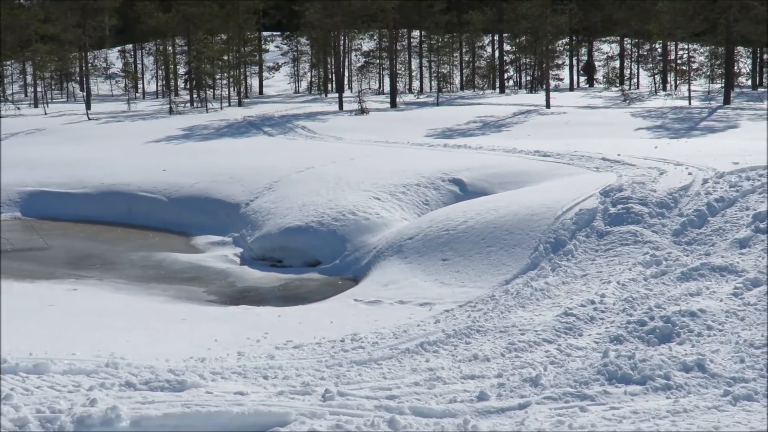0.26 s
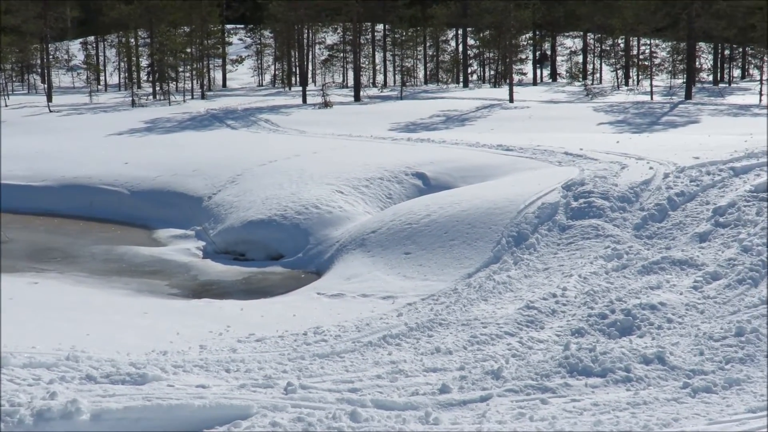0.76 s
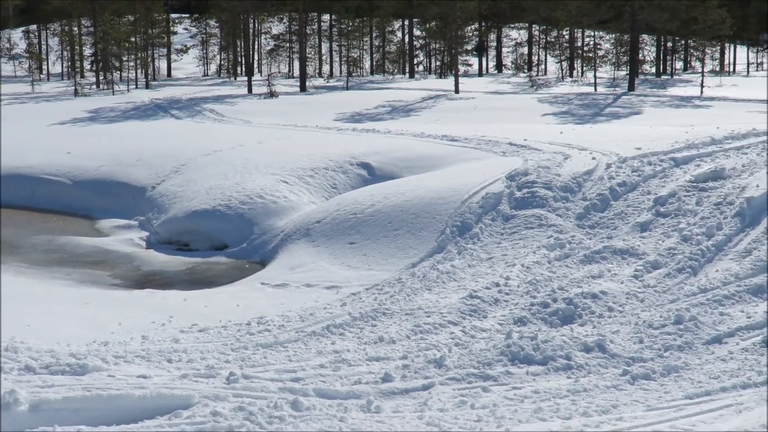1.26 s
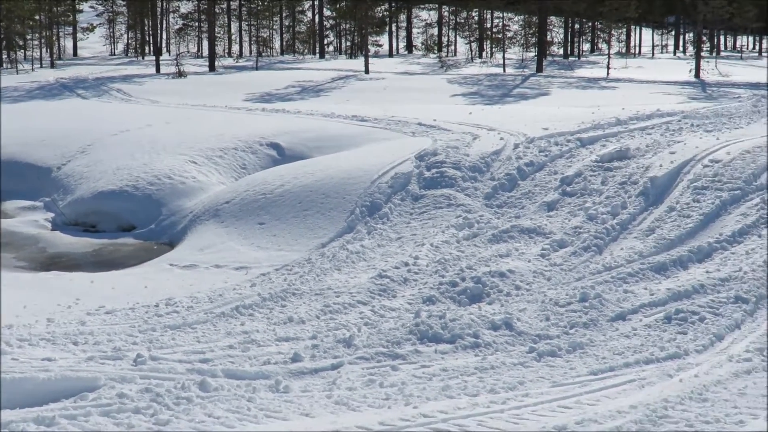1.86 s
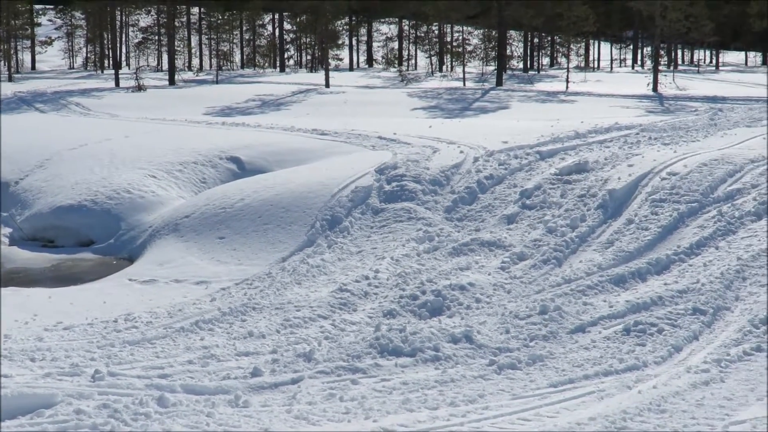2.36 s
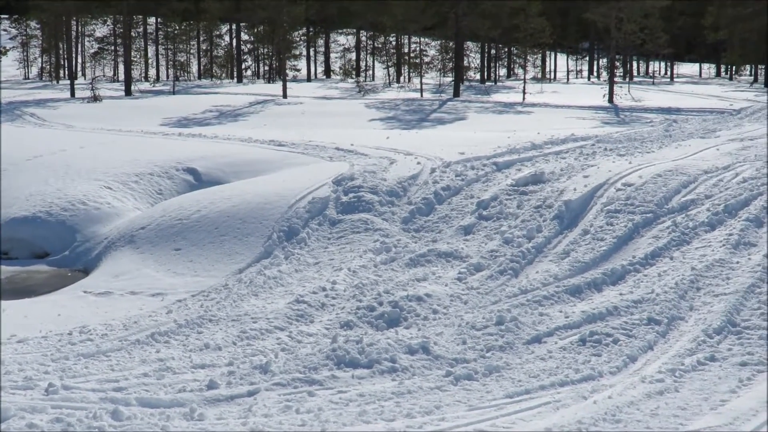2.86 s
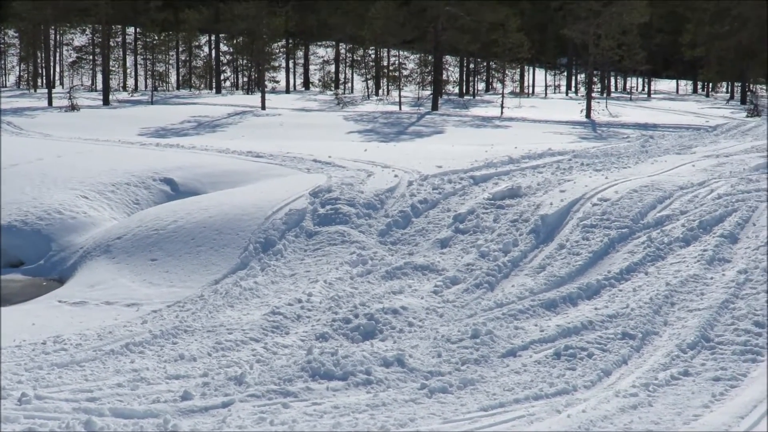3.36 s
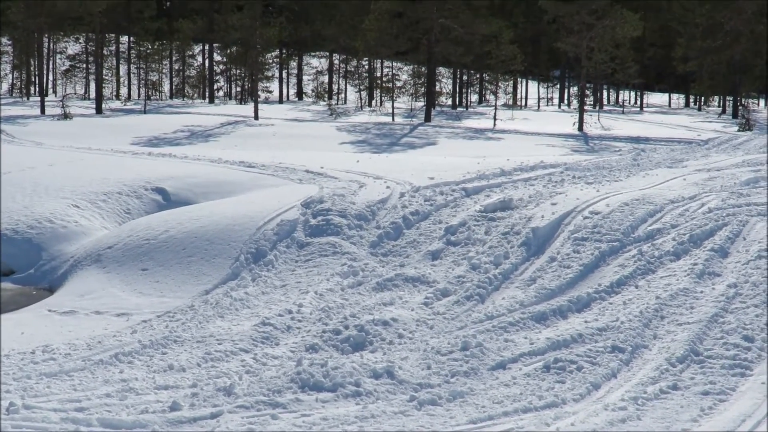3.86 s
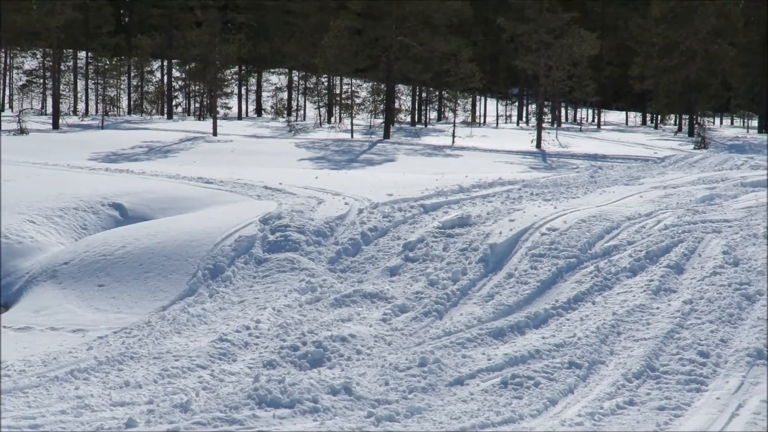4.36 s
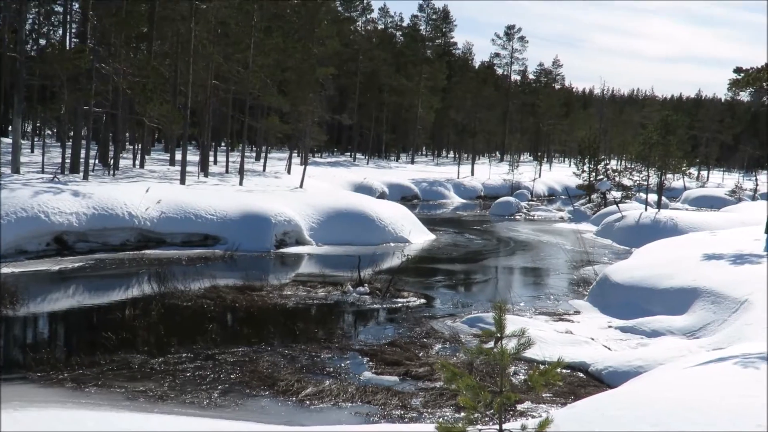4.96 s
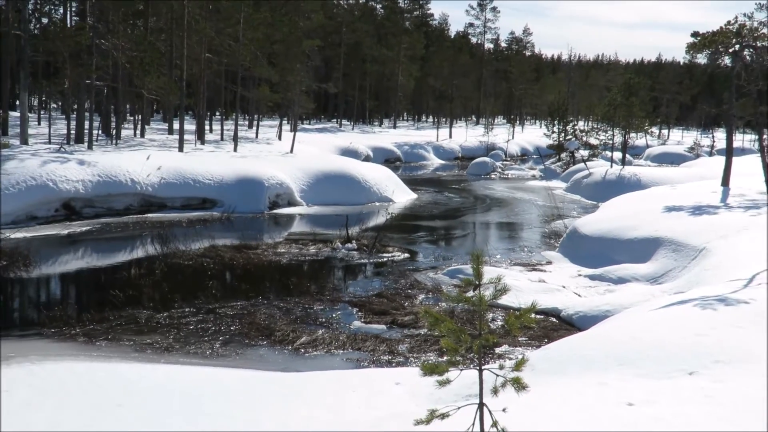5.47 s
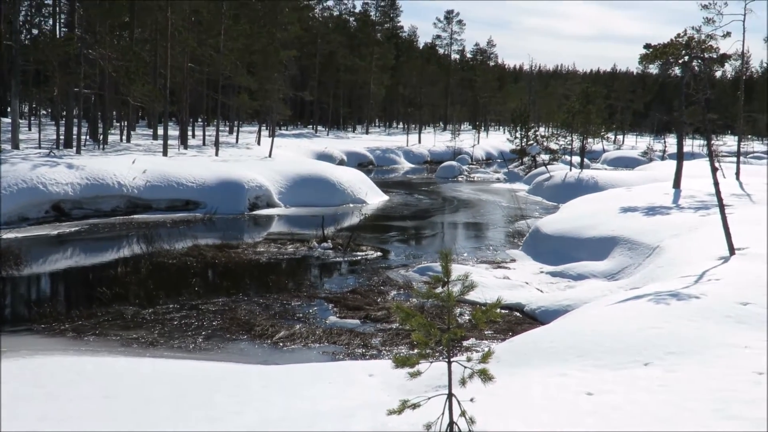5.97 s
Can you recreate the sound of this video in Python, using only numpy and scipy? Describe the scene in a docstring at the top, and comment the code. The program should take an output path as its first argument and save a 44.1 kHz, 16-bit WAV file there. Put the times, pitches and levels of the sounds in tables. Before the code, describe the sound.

Outdoors on open snow, a two-stroke snowmobile idles close to the microphone. Its deep, rapid muffled putter hunts constantly, catching harder about six times a second and sagging again. A quieter casing rasp, faint metallic ticks, occasional dull knocks and light low wind buffets accompany it. Near four and a half seconds comes a very short silence and a tiny pop, then the same engine continues from a sheltered spot, with stronger rattling and no wind.

```python
"""Open snow: a two-stroke snowmobile idles close by, two firings to each turn of the crank.
It hunts: about six times a second a few firings catch strongly, then the charge burns weakly again.
Pulses and gas puffs boom through the muffler, sine orders form the intake drone, and filtered noise makes
the casing's rasp, its knocks, hiss swishes and light gusts; gritty scrapes ring as the piston's tick.
After a short silence the engine is heard from another, sheltered spot."""
import sys
import numpy as np
from scipy import signal
from scipy.fft import rfft, irfft, next_fast_len
from scipy.io import wavfile
from scipy.ndimage import uniform_filter1d

SR = 44100
rng = np.random.default_rng(int(sys.argv[2]) if len(sys.argv) > 2 else 0)


def log_audio(samples):
    """Write samples as a 16-bit WAV file to the path given in sys.argv[1]."""
    # one column per channel
    frames = np.atleast_2d(samples).T
    # limit to full scale, then quantise
    limited = np.clip(frames, -1, 1)
    pcm = np.round(limited * 32767).astype(np.int16)
    wavfile.write(sys.argv[1], SR, pcm)


N = 273861
T = np.arange(N) / SR

# The silence between spot A and spot B: start and end in seconds.
SILENCE = (4.5715, 4.6544)
# Engine speed. Each row: time in seconds, firings per second.
SPEED = [(0.0, 77.23), (0.5, 77.56), (0.9, 77.88), (1.3, 77.43), (1.65, 78.17), (2.0, 76.75), (2.4, 77.39),
         (2.8, 76.87), (3.1, 77.74), (3.4, 76.92), (3.7, 76.24), (4.0, 77.41), (4.4, 76.85), (4.8, 77.25),
         (5.2, 77.34), (5.6, 77.28), (5.9, 76.59), (6.2, 76.39)]
# Moments at which the engine catches. Each row: time in seconds, time to sag back in seconds,
# how early the pulses come in ms, how much harder they are in dB.
SURGES = [(0.122, 0.049, 1.9, 5.5), (0.284, 0.059, 1.7, 4.5), (0.456, 0.049, 2.0, 4.0),
          (0.549, 0.144, 0.5, 1.5), (0.732, 0.074, 2.0, 5.0), (0.824, 0.061, 0.8, 1.0),
          (0.923, 0.06, 1.9, 5.0), (1.026, 0.03, 1.2, 2.0), (1.204, 0.053, 1.5, 5.0),
          (1.315, 0.08, 1.5, 4.0), (1.511, 0.04, 1.6, 5.5), (1.692, 0.056, 1.8, 3.5),
          (1.823, 0.103, 0.7, 2.0), (1.963, 0.137, 1.5, 3.0), (2.14, 0.069, 1.9, 4.0),
          (2.295, 0.061, 1.7, 5.0), (2.406, 0.08, 1.5, 4.0), (2.58, 0.16, 1.3, 1.5),
          (2.78, 0.067, 2.3, 4.0), (2.971, 0.06, 1.1, 3.0), (3.145, 0.032, 0.8, 4.5),
          (3.314, 0.071, 2.2, 3.5), (3.482, 0.077, 2.2, 5.0), (3.648, 0.065, 2.1, 5.0),
          (3.775, 0.121, 1.4, 3.0), (3.967, 0.053, 1.5, 4.5), (4.206, 0.045, 1.3, 4.5),
          (4.345, 0.097, 1.5, 4.0), (4.495, 0.144, 1.7, 3.5), (4.675, 0.04, 0.8, 4.0),
          (4.808, 0.16, 1.5, 1.5), (4.955, 0.146, 2.5, 0.5), (5.131, 0.069, 2.5, 4.0),
          (5.263, 0.159, 1.3, 3.5), (5.471, 0.085, 1.8, 2.0), (5.612, 0.09, 1.0, 2.5),
          (5.701, 0.037, 1.7, 3.0), (5.848, 0.082, 2.4, 4.0), (6.0, 0.126, 1.8, 4.0)]
# Colour of the casing rasp at spot A. Each row: frequency in Hz, relative density in dB per Hz.
CASING_A = [(250, -7), (450, -0.5), (620, -1), (950, -2), (1250, -7), (1800, -13), (2400, -16.5),
            (3100, -18), (3800, -19.5), (5000, -28), (6000, -32.5), (8000, -37.5), (12000, -41),
            (14000, -50)]
# Cowl panel resonances. Each row: centre in Hz, width in Hz, height in dB.
PANELS = [(503, 28, -2), (565, 29, -8), (620, 100, 1), (655, 98, 3), (795, 28, -11), (810, 21, 4.5),
          (954, 29, 4), (1210, 15, -9.5), (1220, 110, 1.5), (1704, 58, 5), (1924, 39, 5.5), (2140, 74, 4),
          (2390, 54, 1.5), (2600, 78, -0.5), (2720, 120, -1.5), (3140, 130, -4.5), (3690, 110, -7),
          (4070, 68, 0), (4520, 110, -1.5)]


def gain_of(db):
    """Decibels to amplitude."""
    return 10 ** (np.asarray(db) / 20)


def evened(x):
    """Scales to rms 1."""
    return x / np.sqrt(np.mean(x ** 2) + 1e-20)


def curve(rows, column=1):
    """One column of a time table, interpolated at every sample."""
    rows = np.asarray(rows)
    return np.interp(T, rows[:, 0], rows[:, column])


def drift(rate_hz):
    """Random wander of rms 1, mostly slower than rate_hz."""
    hz = np.fft.rfftfreq(N, 1 / SR)
    spectrum = rfft(rng.standard_normal(N)) / (1 + (hz / rate_hz) ** 4)
    return evened(irfft(spectrum, N))


def swells(rows):
    """One bell per row (middle s, reach s, ..): it falls to exp(-2) one reach from its middle."""
    return np.array([np.exp(-2 * ((T - middle) / reach) ** 2) for middle, reach, _ in rows])


def colour(x, points, peaks=(), size=8192):
    """Causal minimum-phase filter from a spectrum in dB, with resonances laid over it."""
    hz = abs(np.fft.fftfreq(size, 1 / SR))
    f, db = np.transpose(points)
    db = np.interp(np.log(hz + 1), np.log(f + 1), db)
    for centre, width, height in peaks:
        db = db + height / (1 + (2 * (hz - centre) / width) ** 2)
    spectrum = np.exp(signal.hilbert(np.log(gain_of(db))).conj())
    response = np.fft.ifft(spectrum).real
    return signal.oaconvolve(x, response[:size // 2])[:N]


def clicks(times, sizes):
    """A train of single-sample clicks."""
    places = np.clip(np.round(times * SR).astype(int), 0, N)
    return np.bincount(places, sizes, N + 1)[:N]


def surges(times):
    """Course of every surge, 0 to 1: a quick catch and a slow sag."""
    catch_rise_s = .008
    start, sag_s = np.transpose(SURGES)[:2]
    since = times[:, None] - start
    catch = (1 + np.tanh(since / catch_rise_s)) / 2
    return catch * np.exp(-(np.maximum(since, 0) / sag_s) ** 3)


def surging(times):
    """How much harder the charge burns at these times, in dB."""
    return surges(times) @ np.array(SURGES)[:, 3]


def leading(times):
    """Seconds by which the engine runs early: it jumps ahead as it catches, then falls back."""
    return surges(times) @ np.array(SURGES)[:, 2] / 1000  # ms to s


def firings(cycles):
    """Time and strength of each firing: a strong charge blows harder and sooner, a stumble burns late."""
    # Stumbles, single charges that burn late: times in seconds.
    stumbles = [.209, .389, .545, .618, .821, .918, 1.022, 1.31, 1.597, 1.691, 1.801, 1.957, 2.4, 2.549,
                2.778, 2.895, 3.099, 3.252, 3.416, 3.479, 3.64, 4.137, 4.773, 4.953, 5.128, 5.602]
    late_s, scatter_db, jitter_s = .0022, .7, .00019
    times = np.interp(np.arange(int(cycles[-1]) + 1), cycles, T)
    size, slip = rng.standard_normal((len(times), 2)).T
    nearest = abs(times[:, None] - np.array(stumbles)).argmin(axis=0)
    late = np.isin(np.arange(len(times)), nearest)
    strength = gain_of(surging(times) + scatter_db * np.clip(size, -2, 2))
    return times - leading(times) + jitter_s * slip + late_s * late, strength


def exhaust(pulses, muffler):
    """Each firing drives a pulse and a turbulent puff through the muffler; its packing swallows treble."""
    # Standing waves in the exhaust pipe. Each row: centre in Hz, width in Hz, height in dB.
    pipe = [(127, 6, 13), (337, 10, 19), (372, 11, 2.5), (430.3, 15, 8.5)]
    gas, puff_s, packing_hz = .33, .006, 1300  # gas against pulses, puff decay, lowpass corner
    puff_shape = signal.lfilter([1], [1, -np.exp(-1 / (puff_s * SR))], np.sign(pulses))
    puffs = puff_shape * rng.standard_normal(N)
    boom = colour(evened(pulses) + gas * evened(puffs), muffler, pipe)
    packing = signal.butter(4, packing_hz, fs=SR, output="sos")
    return evened(signal.sosfilt(packing, boom))


def drone(cycles, follow, column):
    """The intake pumps with the crank, after the exhaust: sine orders that bend gently with each surge."""
    # Intake orders. Each row: multiple of the firing rate, level in dB against the exhaust at spot A,
    # the same at spot B ahead of the scene's drone trim.
    orders = [(1, -22, -23), (2.5, -23, -26), (4, -17, -27), (4.5, -30, -33), (5, -23, -35),
              (5.5, -29, -30), (6, -38, -22), (7, -41, -33), (8, -37, -35), (9, -37, -31), (10, -44, -26.5),
              (11, -37, -27), (12, -43, -37), (13, -42, -37), (16, -48, -37), (22, -51, -41)]
    intake_lag = 5 / 8  # firing cycles behind the exhaust
    waver, wobble = .27, .008  # rms share of amplitude, rms firing cycles
    coarse = T[::128]
    ahead = follow * np.interp(T, coarse, leading(coarse)) * curve(SPEED)
    phase = cycles - intake_lag + ahead + wobble * drift(5.5)
    out = np.zeros(N)
    for row in orders:
        level = np.sqrt(2) * gain_of(row[column]) * (1 + waver * drift(18))
        out += level * np.sin(2 * np.pi * row[0] * phase)
    return out


def rasp(cycles, pulses, casing, knock, flutter_db):
    """Fan and running gear rush through the cowl, throbbing with the firings that also knock on it."""
    throb = .14
    rush = rng.standard_normal(N) * (1 + throb * np.cos(2 * np.pi * cycles))
    rush = rush * gain_of(flutter_db * drift(19))
    blows = signal.lfilter(*signal.butter(2, 2000, fs=SR), evened(pulses))  # the blows are blunt
    return evened(colour(evened(rush) + knock * blows, casing, PANELS))


def piston(cycles):
    """Once a turn a piston scrapes its bore: a burr that rings the cylinder and a thin, singing metal part."""
    # Ring of the cylinder. Each row: frequency in Hz, relative level in dB, t60 in seconds.
    modes = [(2510, -2, 0.011), (2800, -9.5, 0.015), (3055, -7.5, 0.019), (3400, -12.5, 0.016),
             (4070, 2, 0.009), (4114, 1, 0.014), (4264, 2, 0.0078), (4450, -11.5, .008),
             (5060, -9.5, 0.0061), (5280, -14, 0.0099)]
    # Loudness of the tick. Each row: time in seconds, level in dB.
    tick_level = [(0, -60.5), (2, -53), (2.8, -52.5), (3.2, -58), (3.6, -52.5), (3.97, -44), (4.08, -50),
                  (4.55, -49.5), (4.65, -65.5)]
    # Loudness of the singing part. Each row: time in seconds, level in dB.
    sing_level = [(0, -62), (.55, -62.5), (.9, -59), (2.6, -67), (3.2, -70.5), (3.9, -64.5), (4.55, -74),
                  (4.65, -74)]
    slap_lag = 7 / 6  # firing cycles behind the first exhaust pulse
    sing_hz, sing_t60_s = 4885, 0.033
    scrape_s, steady = .0049, .35  # half-length of the burr, constant share that feeds the singing
    since = ((cycles - slap_lag + 1) % 2 - 1) / curve(SPEED)  # seconds from the nearest slap
    scrape = np.exp(-(since / scrape_s) ** 4)
    grit = rng.choice([-1, 1], N)
    t = T[:SR // 10]
    ring = np.zeros(len(t))
    for k, (hz, db, t60) in enumerate(modes):
        ring += gain_of(db - 60 * t / t60) * (-1) ** k * np.sin(2 * np.pi * hz * t)
    sing = gain_of(-60 * t / sing_t60_s) * np.sin(2 * np.pi * sing_hz * t)
    tick = evened(signal.oaconvolve(scrape * grit, ring)[:N])
    singing = evened(signal.oaconvolve((steady + scrape) * grit, sing)[:N])
    return gain_of(curve(tick_level)) * tick + gain_of(curve(sing_level)) * singing


def knocks(decay_s=0.0045, trim_db=-2):
    """Now and then a loose panel gives one harder knock: a decaying noise burst through the cowl."""
    # Harder knocks on the cowl. Each row: start in seconds, peak in dB ahead of the trim.
    hits = [(0.993, -19.5), (1.919, -24), (1.975, -21.5), (2.128, -20.5), (2.378, -25), (2.725, -22.5),
            (4.753, -19.5), (5.228, -19), (5.32, -21.5)]
    out = np.zeros(N)
    for start, peak_db in hits:
        burst = rng.standard_normal(N) * (T >= start) * np.exp(-abs(T - start) / decay_s)
        blow = colour(burst, CASING_A, PANELS)
        blow = signal.lfilter(*signal.butter(2, 1300, fs=SR), blow)  # the knock is blunt
        out += gain_of(peak_db + trim_db) * blow / abs(blow).max()
    return out


def swishes():
    """Brief, grainy swishes of high hiss: coloured noise under bell-shaped swells."""
    # Swishes. Each row: middle in seconds, reach in seconds, level in dB.
    spells = [(.39, 0.036, -64), (1.013, 0.023, -58), (1.205, 0.028, -57), (1.313, 0.049, -62),
              (1.96, 0.044, -58.5), (2.148, .05, -66), (2.898, 0.041, -59), (5.588, 0.023, -67),
              (5.97, .05, -67)]
    # Their colour. Each row: frequency in Hz, relative density in dB per Hz.
    hiss_colour = [(1000, -21), (4000, -8), (6500, 2), (9000, -4), (12000, -3.5), (14000, -14.5)]
    grain_db = 3
    grainy = rng.standard_normal(N) * gain_of(grain_db * drift(300))
    hiss = evened(colour(grainy, hiss_colour))
    return gain_of(np.array(spells)[:, 2]) @ swells(spells) * hiss


def wind():
    """Gusts swell and fade; their eddies buffet each microphone port on its own."""
    # Light gusts. Each row: middle in seconds, reach in seconds, level in dB.
    gust_rows = [(0.337, 0.044, -15.5), (0.632, 0.4, -26.5), (1.225, .15, -29.5), (1.688, 0.17, -31),
                 (2.088, 0.32, -25), (2.62, 0.34, -23.5), (3.01, 0.18, -24), (3.682, 0.47, -25.5),
                 (4.44, 0.36, -24)]
    # Colour of the buffeting. Each row: frequency in Hz, relative density in dB per Hz.
    buffet_colour = [(30, -23.5), (70, -12.5), (110, -5), (200, 3), (300, -10.5), (450, -15.5),
                     (580, -26.5), (1000, -48.5), (4000, -78.5)]
    buffet_db, buffet_hz = 1, 22  # depth and rate of the lumps within a gust
    gusts = gain_of(np.array(gust_rows)[:, 2]) @ swells(gust_rows)
    eddies = []
    for port in "LR":
        lumpy = rng.standard_normal(N) * gain_of(buffet_db * drift(buffet_hz))
        eddies.append(evened(colour(lumpy, buffet_colour)))
    return gusts * np.array(eddies)


def spread(x, t60=0.036):
    """Scatter from the machine and the snow reaches the two ears with a wandering phase."""
    # Difference between the ears. Each row: frequency in Hz, side level against mid in dB.
    width = [(60, -36.5), (160, -43.5), (300, -22.5), (700, -17), (1500, -12), (3000, -10.5), (5000, -7),
             (9000, 0), (13000, 4.5)]
    t = T[:SR // 20]
    scatter = rfft(rng.standard_normal(len(t)) * gain_of(-60 * t / t60))
    echo = irfft(scatter / abs(scatter))  # flat spectrum, scrambled phase
    scattered = signal.hilbert(signal.oaconvolve(x, echo), next_fast_len(N + SR))[:N]
    turned = (scattered * np.exp(1j * np.pi * drift(10.0))).real
    side = colour(turned, width)
    return np.array([x + side, x - side]) * gain_of([[-.2], [.2]])


def scene():
    """One engine, heard first from spot A and then from spot B; the casing rattles in spells."""
    # Loudness at spots A and B. Each row: time in seconds, exhaust in dB, casing rasp in dB.
    levels_a = [(0, -13, -31), (0.4, -15, -35), (0.9, -11.5, -31.5), (1.3, -12.5, -33.5), (2.85, -13, -32),
                (3.15, -19, -39.5), (3.55, -13, -32), (4.0, -12.5, -32), (4.55, -14.5, -34)]
    levels_b = [(4.7, -11.5, -27.5), (5.0, -14, -31), (5.25, -11, -26.5), (5.5, -13, -29.5),
                (6.2, -10, -23.5)]
    # Muffler response at spots A and B. Each row: frequency in Hz, relative response in dB.
    muffler_a = [(15, -60), (30, -43.5), (52, -10), (72, -7), (105, 5), (148, 4.5), (190, 0), (232, 4.5),
                 (290, 0), (345, -19.5), (430, -20), (520, -35), (900, -43)]
    muffler_b = [(15, -63.5), (30, -36), (52, -14), (75, -8.5), (105, 5), (150, 2), (190, 0.5), (232, -3.5),
                 (275, -8), (380, -33.5), (465, -22.5), (560, -30), (900, -66.5), (5000, -100)]
    # Colour of the casing rasp at spot B. Each row: frequency in Hz, relative density in dB per Hz.
    casing_b = [(30, -14.5), (250, 12), (360, 5), (480, 12), (620, 2), (1000, -1.5), (1600, -5),
                (2000, -16), (2330, -11), (2600, -18.5), (3700, -17), (4600, -29), (6500, -35.5),
                (12000, -43.5), (14000, -75)]
    # Harder rattling of the casing. Each row: middle in seconds, reach in seconds, boost in dB.
    rattles = [(0.543, 0.051, 1.5), (0.59, 0.037, 0.5), (0.874, 0.1, 1.8), (1.449, 0.043, 1),
               (1.937, 0.061, 1.5), (2.127, 0.041, 3.5), (2.71, 0.031, 2.5), (3.037, 0.035, 3),
               (3.452, 0.05, 2.5), (4.768, 0.046, 6), (4.852, 0.023, 4.5), (4.952, 0.027, 4.5),
               (5.121, 0.06, 3.5), (5.245, 0.083, 2.5), (5.343, 0.048, 4.5), (5.454, 0.068, 0.5),
               (5.61, 0.11, 3.5), (5.767, 0.028, 3.5), (5.971, 0.046, 4), (6.157, 0.077, 0.5)]
    follow_a, follow_b = .35, .3  # share of a surge's pitch bend that the drone follows
    first_firing = 1 / 4  # firing cycles that pass before the first firing
    drone_b_db = -3.5  # drone trim at spot B

    cycles = np.cumsum(curve(SPEED)) / SR - first_firing  # running count of firings
    pulses = clicks(*firings(cycles))
    rattle_db = np.array(rattles)[:, 2] @ swells(rattles)

    engine_a = exhaust(pulses, muffler_a) + drone(cycles, follow_a, column=1)
    rasp_a = rasp(cycles, pulses, CASING_A, knock=0.46, flutter_db=0.77)
    first = gain_of(curve(levels_a, column=1)) * engine_a
    first += gain_of(curve(levels_a, column=2) + rattle_db) * rasp_a

    # at spot B the drone swells along with the rattle
    drone_b = gain_of(rattle_db + drone_b_db) * drone(cycles, follow_b, column=2)
    rasp_b = rasp(cycles, pulses, casing_b, knock=0.088, flutter_db=1.5)
    second = gain_of(curve(levels_b, column=1)) * (exhaust(pulses, muffler_b) + drone_b)
    second += gain_of(curve(levels_b, column=2) + rattle_db) * rasp_b

    machine = np.where(T < SILENCE[0], first, second)
    return spread(machine + piston(cycles) + knocks() + swishes()) + wind()


def levelled(x):
    """Quick, gentle gain control evens out part of the rise and fall in level."""
    rest_db, share, window_s = -13.2, .45, .026  # level left as it is, share taken away, averaging time
    power = uniform_filter1d((x ** 2).mean(0), int(window_s * SR))
    power_db = 10 * np.log10(abs(power) + 1e-9)
    excess_db = uniform_filter1d(power_db - rest_db, int(window_s * SR / 2))
    return x * gain_of(-share * excess_db)


def record(dry, pop_db=-15, pop_s=0.0003):
    """Gain control, a brief cut between the spots, a small pop on the return, then the band limit."""
    fade_s, edge_hz = .002, 13700
    before = np.clip((SILENCE[0] - T) / fade_s, 0, 1)
    after = np.clip(np.minimum(T - SILENCE[1], T[-1] - T) / fade_s, 0, 1)  # also fades out at the end
    heard = levelled(dry) * (before + after)
    pop = gain_of(pop_db) * (T >= SILENCE[1]) * np.exp(-abs(T - SILENCE[1]) / pop_s)
    band_limit = signal.ellip(8, .1, 90, edge_hz, fs=SR, output="sos")
    return signal.sosfilt(band_limit, heard + pop)


dry = scene()
out = record(dry)
log_audio(out)
```